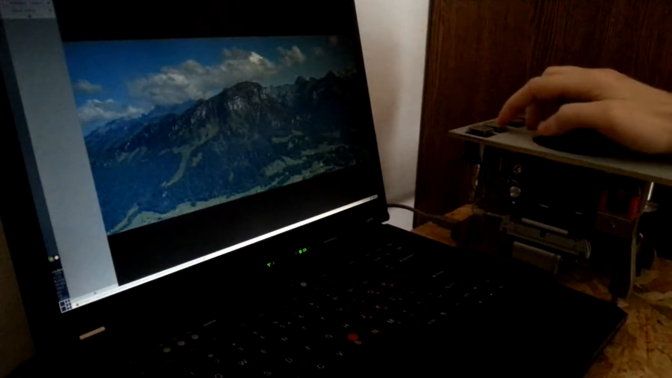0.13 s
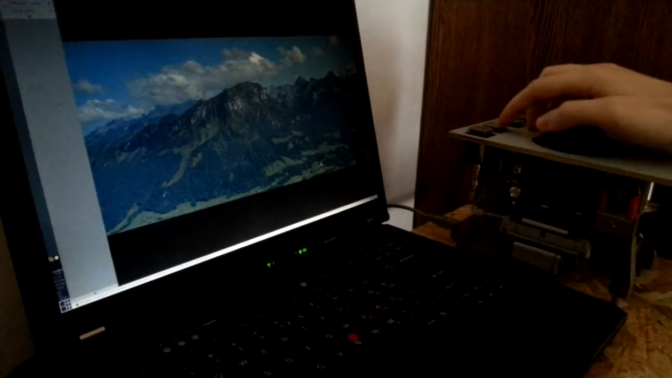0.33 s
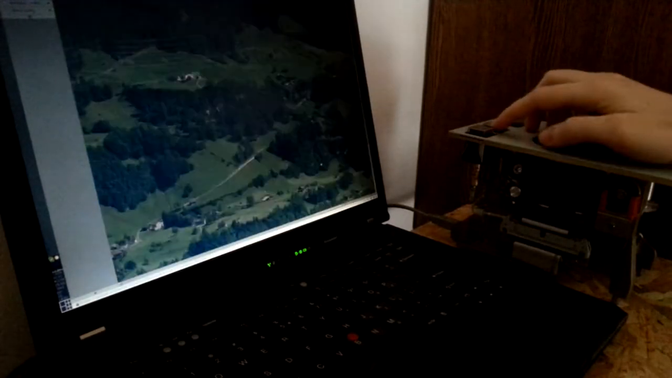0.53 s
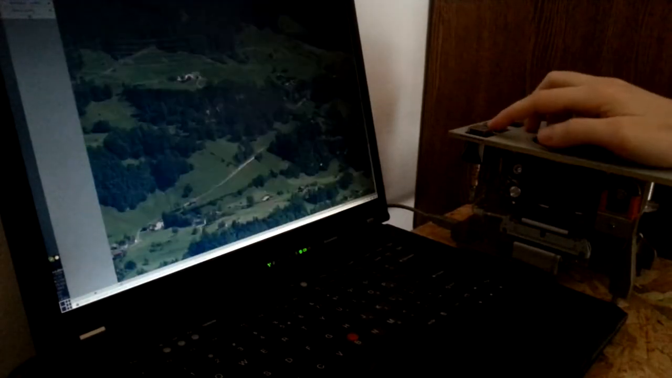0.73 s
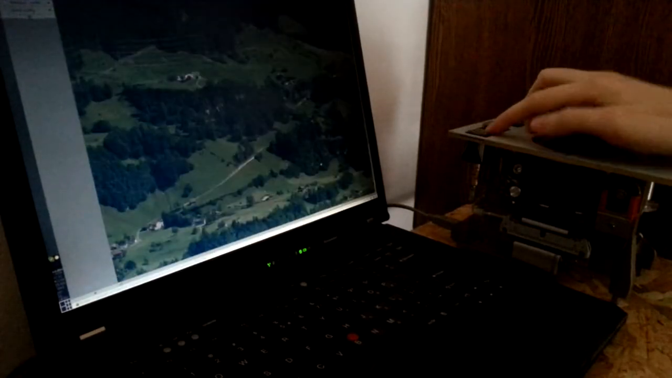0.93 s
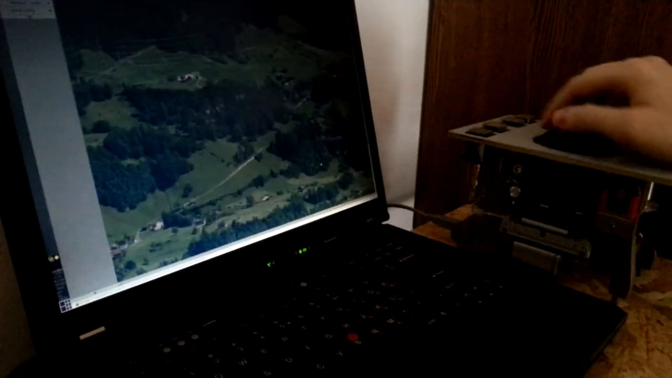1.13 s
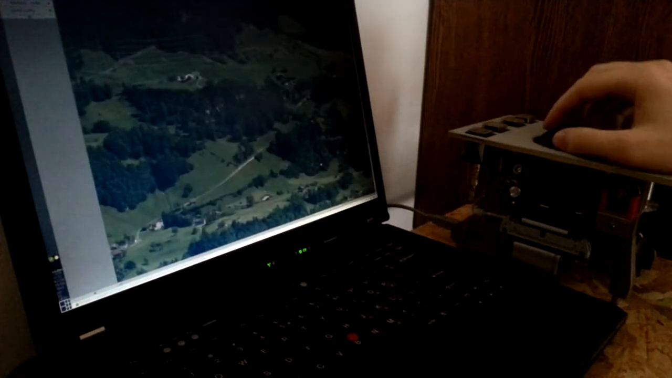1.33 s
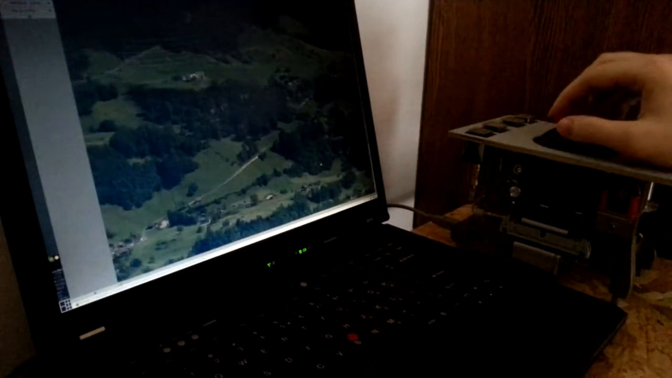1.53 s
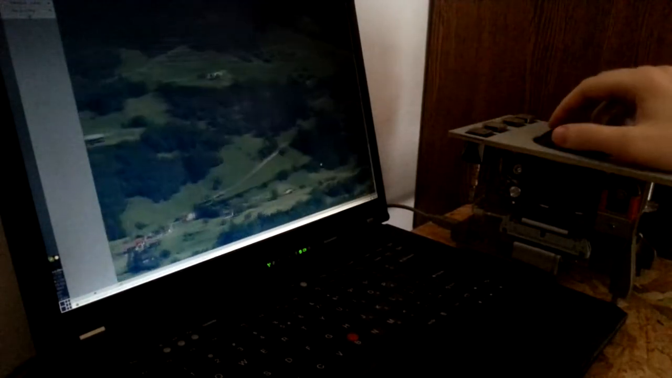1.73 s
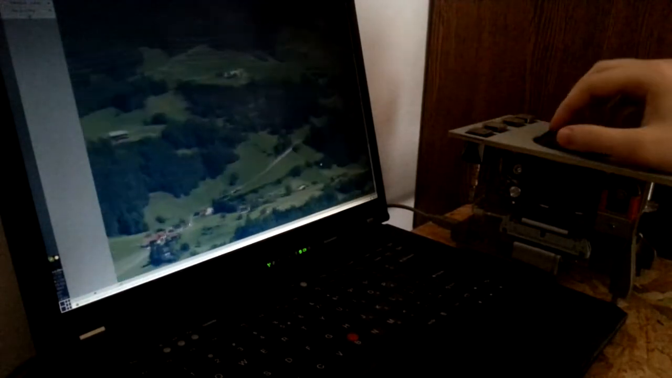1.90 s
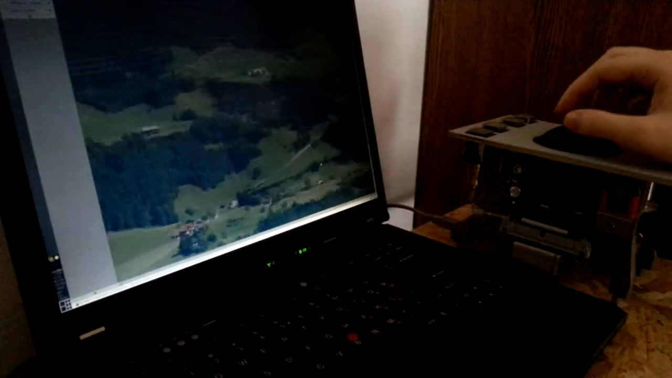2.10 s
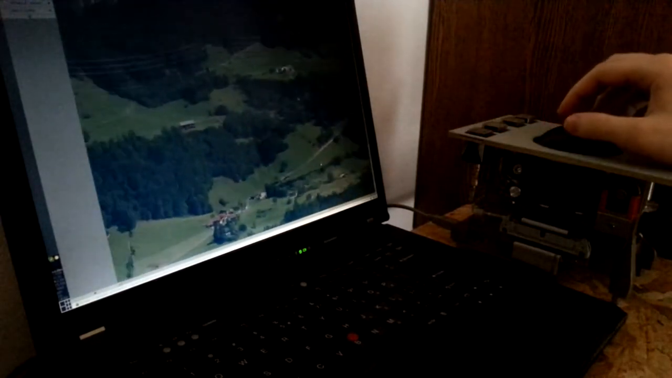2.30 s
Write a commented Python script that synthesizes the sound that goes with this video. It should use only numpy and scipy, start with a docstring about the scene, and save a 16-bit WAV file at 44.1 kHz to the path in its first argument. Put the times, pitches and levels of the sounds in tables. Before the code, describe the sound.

Close up in a small quiet room, two hard, hollow plastic clicks with separate releases, a short pause, then a much quieter rumbling of a hand-spun ball with small bumps and thin grit, over faint steady hiss.

```python
"""A shelf beside a desk in a small room, with a trackball on it, heard in stereo over a faint steady hiss.
Two buttons are pressed and released: each snap is noise and decaying modes that rattle the plastic case
and thump the shelf, with a short room tail. Then the fingers spin the ball twice: random small bumps on
its bearings ring the same shelf, add a thin grit, and the ball knocks now and then."""
import sys
import numpy as np
from scipy import signal
from scipy.fft import rfft, irfft, next_fast_len
from scipy.io import wavfile
from scipy.ndimage import uniform_filter1d

SR = 44100
rng = np.random.default_rng(int(sys.argv[2]) if len(sys.argv) > 2 else 0)


def materialize(psi):
    """Save the field psi as 16-bit PCM at rate SR to the path in sys.argv[1].

    A 1-D psi becomes a single channel; in a 2-D psi each row is a channel.
    """
    bounded = np.clip(np.atleast_2d(psi).T, -1, 1)
    quanta = np.round(bounded * 32767).astype(np.int16)
    wavfile.write(sys.argv[1], SR, quanta)


N = 101430  # length [samples]

# colour of the case's dense rattle, also under the ball's thuds: (frequency [Hz], level [dB])
RATTLE_COLOUR = [(100, -16.5), (190, 4.5), (250, -6), (340, -2), (680, 2.5), (980, 0), (1350, 6.5),
                 (1800, 4.5), (2200, 7), (2700, -2), (3400, 6), (4100, -3.5), (4900, -0.5), (7000, -1),
                 (15000, 1)]
LEFT_RIGHT = np.array([[1], [-1]])  # sign of each side


def undb(db):
    """Decibels to gain."""
    return 10 ** (np.asarray(db) / 20)


def unit(x):
    """Scale to rms 1."""
    return x / np.sqrt(np.mean(x ** 2))


def colour(x, points):
    """Minimum-phase, hence causal, filter through (frequency [Hz], level [dB]) points."""
    hz, db = np.array(points, float).T
    size = 2 * next_fast_len(x.shape[-1])
    half = size // 2
    f = np.maximum(np.arange(half + 1) * SR / size, 1)
    log_gain = np.log(undb(np.interp(np.log(f), np.log(hz), db)))
    cepstrum = irfft(log_gain)
    # folding the cepstrum onto positive times makes the response causal
    cepstrum[1:half] *= 2
    cepstrum[half + 1:] = 0
    response = np.exp(rfft(cepstrum))
    return irfft(rfft(x, size) * response)[..., :x.shape[-1]]


def stereo_noise(size):
    """White noise, more alike on both sides in the bass and unrelated in the treble."""
    # side against mid: (frequency [Hz], level [dB])
    side_width = [(60, -6), (190, -9.5), (380, -4), (700, -1.5), (1300, -1.5), (2400, 0), (15000, 0.5)]
    mid, side = rfft(rng.standard_normal((2, size)))
    hz, db = np.array(side_width).T
    width = undb(np.interp(np.arange(len(mid)) * SR / size, hz, db))
    left_right = np.array([mid + width * side, mid - width * side])
    return irfft(left_right / np.sqrt(1 + width ** 2), size)


def decay(t, t60):
    """Exponential decay by 60 dB in t60 seconds."""
    return np.exp(-np.log(1000) * t / t60)


def fade(t, t60):
    """Exponential decay of unit energy."""
    return decay(t, t60) * np.sqrt(2 * np.log(1000) / t60 / SR)


def ring(modes, t, spread, lag=0):
    """Stereo sum of decaying modes; each peaks at its level in the spectrum, with a random phase."""
    out = 0
    for (hz, db, t60), (a, b) in zip(modes, rng.standard_normal((len(modes), 2))):
        side_phase = spread * np.sign(b) - np.pi * hz * lag
        phase = np.pi * a + side_phase * LEFT_RIGHT
        gain = undb(db) * 2 * np.log(1000) / t60 / SR
        out = out + gain * decay(t, t60) * np.sin(2 * np.pi * hz * t + phase)
    return out


def shelf_ring(t):
    """The low ring of shelf and housing, whose phase lags on the left microphone."""
    # modes of the shelf and housing: (frequency [Hz], spectral level [dB], t60 [s])
    shelf_modes = [(156, 4, 0.31), (173.3, 3.5, 0.25), (199.7, 5, 0.21), (312.8, 7, 0.17), (328, 8, 0.079),
                   (357, 3.5, 0.1), (439.7, -2, 0.44), (485.5, 2, 0.11), (522, -4.5, 0.062),
                   (638, 11, 0.096), (799.5, 8, 0.11)]
    spread_rad, left_lag_s = 0.052, 0.0002
    return ring(shelf_modes, t, spread_rad, left_lag_s)


def add(out, x, start):
    """Mix a sound in at its time [s]."""
    i = max(int(start * SR), 0)
    out[:, i:i + x.shape[1]] += x[:, :N - i]


def steady(x, window_s=0.025, evenness=0.8):
    """Even out the chance swells of a noise by dividing by its smoothed power."""
    power = uniform_filter1d(np.mean(x ** 2, axis=0), int(window_s * SR))
    floor = power.mean() / 20
    return unit(x / (power + floor) ** (evenness / 2))


def hiss(level_db=-45.5):
    """Steady stereo noise with a fixed colour."""
    # (frequency [Hz], level [dB])
    hiss_colour = [(25, -22), (60, -2), (110, 6), (180, 3), (245, 1.5), (370, 4), (480, 3), (2000, -2.5),
                   (3500, -4.5), (5400, -0.5), (6500, -4), (7400, -3), (9000, -6.5), (15500, -9)]
    return undb(level_db) * unit(colour(stereo_noise(N), hiss_colour))


def bump_bursts(bumps, t60):
    """Stereo noise whose power jumps at each bump and decays."""
    tail = np.arange(SR // 2) / SR
    power = signal.fftconvolve(bumps ** 2, fade(tail, t60) ** 2)[:N]
    return stereo_noise(N) * np.sqrt(np.abs(power))


def rolling():
    """Small bumps of the turning ball thud, ring the shelf and make a thin grit."""
    # push on the rolling ball: (time [s], level [dB])
    push_points = [(0, -35), (.04, -75), (.2, -48), (1.205, -77), (1.232, -41), (1.265, -58), (1.35, -48.5),
                   (1.385, -37), (1.435, -41.5), (1.5, -36), (1.6, -39.5), (1.72, -43.5), (1.79, -48),
                   (1.86, -50), (1.89, -35), (2.04, -31), (2.15, -36), (2.22, -35), (2.3, -39)]
    # colour of the rumble through the shelf: (frequency [Hz], level [dB])
    rumble_colour = [(50, -23), (115, -12.5), (165, 3), (205, 1.5), (250, -13.5), (310, 0.5), (345, -1.5),
                     (380, -5.5), (430, -3.5), (520, -5), (580, -26), (632, -34.5), (675, -14), (740, -37),
                     (1000, -40), (4000, -45)]
    # colour of the grit: (frequency [Hz], level [dB])
    grit_colour = [(100, -12), (400, 2), (680, 3.5), (900, -15.5), (1200, 6.5), (1450, 4.5), (1900, -5),
                   (3000, -15), (12000, -47)]
    bumps_per_s, scatter_db = 730, 3.5
    thud_db, thud_t60_s = -2.5, 0.051
    rumble_db, grit_db, grit_t60_s = 1, -14, 0.07
    grit_growth = 1.35  # exponent: the grit grows faster than the rumble as the push rises

    t, tail = np.arange(N) / SR, np.arange(SR // 2) / SR
    push = undb(np.interp(t, *np.array(push_points).T))
    bumps = (rng.random(N) < bumps_per_s / SR) * undb(scatter_db * rng.standard_normal(N))

    signed_bumps = bumps * rng.choice([-1, 1], (1, N))
    ringing = signal.fftconvolve(signed_bumps, shelf_ring(tail))[:, :N]
    thuds = undb(thud_db) * colour(bump_bursts(bumps, thud_t60_s), RATTLE_COLOUR)
    rumble = undb(rumble_db) * steady(colour(ringing + thuds, rumble_colour))

    grit = undb(grit_db) * unit(colour(bump_bursts(bumps, grit_t60_s), grit_colour))
    return push * (rumble + grit * (push / push.max()) ** (grit_growth - 1))


def knocks():
    """The ball knocks against its bearings: a short swelling low tone and a ring of the shelf."""
    # (time [s], level [dB])
    knock_events = [(0.0, -28), (1.412, -22.5), (1.449, -25), (1.642, -28), (1.93, -33.5), (1.966, -29.5),
                    (2.025, -31), (2.059, -25.5), (2.119, -26), (2.188, -32), (2.265, -29)]
    # colour of the shelf's answer: (frequency [Hz], level [dB])
    knock_colour = [(70, -29), (170, 4.5), (320, -9), (600, -22), (3000, -13)]
    bounce_hz, swell_s, ring_db, ring_rise_s = 177.5, 0.0075, 35, 0.0088
    out, t = np.zeros((2, N)), np.arange(SR // 2) / SR
    swell = (t / swell_s * np.exp(1 - t / swell_s)) ** 2
    bounce = swell * np.sin(2 * np.pi * bounce_hz * t)
    for start, db in knock_events:
        rings = colour(shelf_ring(t) * np.minimum(t / ring_rise_s, 1), knock_colour)
        add(out, undb(db) * (bounce + undb(ring_db) * rings), start)
    return out


def buttons():
    """Each contact cracks, rattles the case, rings case and shelf, and dies away in the room."""
    # button contacts: (time [s], rise [s], then levels [dB] of thump, body, knock, snap, ring, tick)
    contacts = [(0.204, 0.0095, 14, 4.2, 2, 0, 5, -4), (0.2194, 0.0037, 21, 26.1, 18, 22.5, 24.5, 17.5),
                (.351, 0.0036, 20, 22, 16.5, 11.5, 15, 7), (0.816, 0.0091, -4, 2.7, -0.5, -7, -2, -21),
                (0.8355, 0.001, 15, 20.9, 9, -1.5, 4.5, -16), (0.8547, 0.0057, 10, 1.3, 0, 7, 11, 3),
                (.8652, 0.0024, 4, 25.4, 12, 15.5, 23.5, 13.5),
                (0.957, 0.0064, 16.5, 15.4, -1.5, -6, -19, -11),
                (0.9968, 0.0031, 6.5, 24.8, 6.5, 20.5, 20.5, 9)]
    # centres of those six bands: (frequency [Hz])
    bands_hz = [170, 380, 1200, 3200, 5200, 9500]
    # modes of the plastic case and buttons: (frequency [Hz], spectral level [dB], t60 [s])
    case_modes = [(1166, 9.5, 0.19), (1302, 9, 0.18), (1367, -6, 0.16), (1502, 10.5, 0.18),
                  (2126, 9.5, 0.049), (2387, 10.5, 0.16), (3085, -5, 0.17), (3510, 12, 0.054),
                  (4880, -4, 0.14), (4650, 11, 0.17)]
    # colour of the room tail ahead of the rattle colour: (frequency [Hz], level [dB])
    room_colour = [(100, 14), (400, 3), (1500, -1), (5000, 1.5), (9000, -5), (15000, -0.5)]
    crack_db, crack_t60_s = -4, 0.034
    rattle_db, rattle_t60_s = -3, 0.1
    room_db, room_t60_s, room_rise_s = -6, 0.34, 0.0093
    case_spread_rad = 0.78  # phase between the microphones

    out, t = np.zeros((2, N)), np.arange(SR // 2) / SR
    dense_fade = undb(crack_db) * fade(t, crack_t60_s) + undb(rattle_db) * fade(t, rattle_t60_s)
    room_fade = undb(room_db) * fade(t, room_t60_s) * np.minimum(t / room_rise_s, 1)
    for start, rise, *band_db in contacts:
        dense = stereo_noise(len(t)) * dense_fade
        room = colour(stereo_noise(len(t)), room_colour) * room_fade
        hit = colour(dense + room, RATTLE_COLOUR)
        hit = hit + shelf_ring(t) + ring(case_modes, t, case_spread_rad)
        # roll off below and above the six bands
        low_end, high_end = (92, band_db[0] - 14.5), (14700, band_db[-1] - 15)
        tone = [low_end, *zip(bands_hz, band_db), high_end]
        add(out, colour(hit * np.minimum(t / rise, 1), tone), start)
    return out


def snaps():
    """Each stroke leaves its own few pitches ringing in switch and housing."""
    # strokes: (time [s])
    stroke_times = [0.2212, 0.3515, 0.8361, 0.8678, 0.9975]
    # one list per stroke: (frequency [Hz], level [dB], t60 [s], left minus right [dB])
    stroke_modes = [
        [(393, -21, 0.15, 2), (1262, -19.5, .14, -4), (2420, -27, .14, 9), (3443, -10.5, 0.077, 5),
         (4040, -18, .1, -4), (4450, -22, 0.3, -5)],
        [(657, -27, 0.18, 2), (1555, -20, 0.041, -10), (2020, -27.5, 0.17, 0), (2255, -22, 0.11, -4),
         (4590, -30, 0.27, -8)],
        [(1118, -12, 0.012, -3)],
        [(333, -20, 0.089, -6), (4764, 6.5, 0.0084, 2), (4880, -26.5, 0.17, -9), (5255, -17.5, 0.11, 6)],
        [(330, -15.5, .16, -2.5), (2450, -30.5, 0.19, -9), (3174, -21, 0.17, -5), (3350, -15.5, 0.051, 17),
         (4670, -19, 0.09, -4), (6000, -8.5, 0.037, 2)],
    ]
    rise_cycles = 2.2
    spread_rad, full_spread_hz = 0.76, 1800  # the phase spread is full above this pitch
    out, t = np.zeros((2, N)), np.arange(SR // 3) / SR
    for start, modes in zip(stroke_times, stroke_modes):
        for hz, db, t60, pan_db in modes:
            phase = LEFT_RIGHT * spread_rad * min(hz / full_spread_hz, 1)
            swing = np.sin(2 * np.pi * hz * t - phase)
            rise = 1 - np.exp(-(hz * t / rise_cycles) ** 2)
            gain = undb(db + LEFT_RIGHT * pan_db / 2)
            add(out, gain * swing * rise * decay(t, t60), start)
    return out


def lingering():
    """Something on the shelf rings on faintly after the buttons: one slowly rising, decaying tone."""
    # (time [s], level before rise and decay [dB])
    linger_events = [(.353, -29.5), (.998, -30.5)]
    hz, t60_s, rise_s = 489, 0.63, 0.18
    out, t = np.zeros((2, N)), np.arange(SR) / SR
    tone = np.sin(2 * np.pi * hz * t) * np.minimum(t / rise_s, 1) * decay(t, t60_s)
    for start, db in linger_events:
        add(out, undb(db) * tone[None], start)
    return out


def fingers():
    """Skin catches and slides briefly over the ball: grainy noise in smooth swells."""
    # fingertips brush the ball: (time [s], width [s], level [dB])
    brush_events = [(1.271, 0.018, -43.5), (1.424, .005, -48), (2.268, 0.017, -39.5)]
    # (frequency [Hz], level [dB])
    brush_colour = [(200, -35), (1500, -3), (3000, 5), (6000, 7), (9000, -10.5), (15000, -11)]
    grain_db, grain_s = 3, 0.0044
    t = np.arange(N) / SR
    touch = sum(undb(db) * np.exp(-.5 * ((t - at) / width) ** 2) for at, width, db in brush_events)
    slow_noise = unit(uniform_filter1d(rng.standard_normal(N), int(grain_s * SR)))
    grain = undb(grain_db * slow_noise)
    return touch * unit(colour(grain * stereo_noise(N), brush_colour))


def scene(pan_edge_hz=1600, low_pan_db=-2.24):
    """The trackball, its low sounds a little to the right, over the steady hiss."""
    background = hiss()
    trackball = rolling() + knocks() + buttons() + snaps() + lingering() + fingers()
    placed = []
    for x, side in zip(trackball, (1, -1)):  # left, right
        pan = [(pan_edge_hz / 2, side * low_pan_db / 2), (pan_edge_hz * 2, 0)]
        placed.append(colour(x, pan))
    return np.array(placed) + background


def record(dry, ceiling=1.29, top_hz=15800):
    """The recorder rounds the highest peaks and cuts the top with a steep low-pass."""
    rounded = ceiling * np.tanh(dry / ceiling)
    low_pass = signal.ellip(14, .2, 70, top_hz, fs=SR, output="sos")
    return signal.sosfilt(low_pass, rounded)


dry = scene()
out = record(dry)
materialize(out)
```